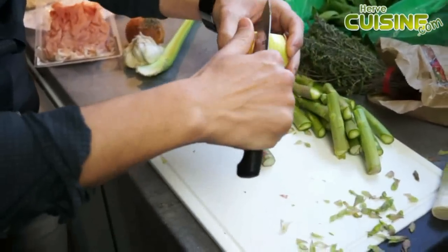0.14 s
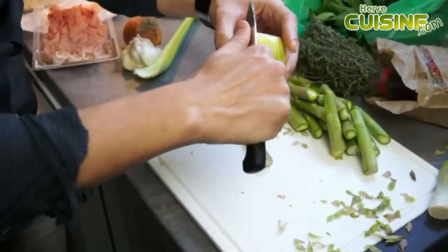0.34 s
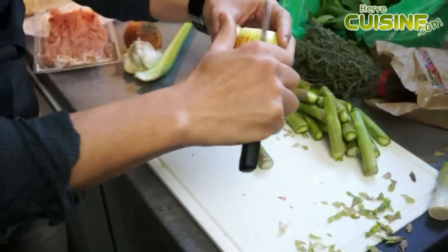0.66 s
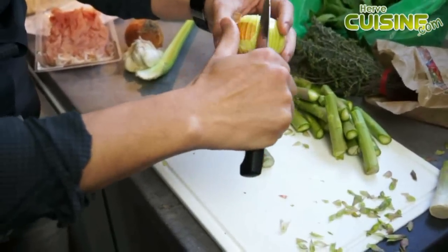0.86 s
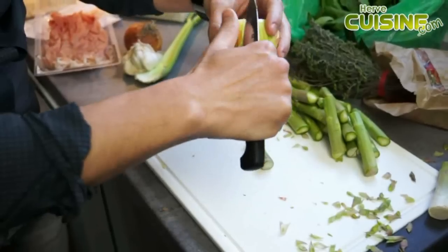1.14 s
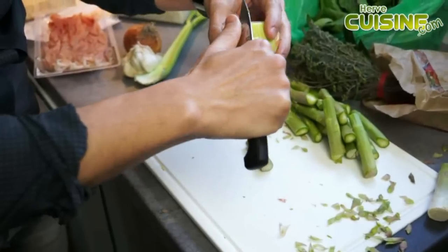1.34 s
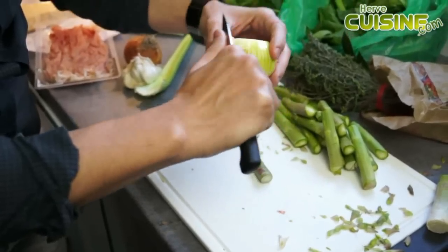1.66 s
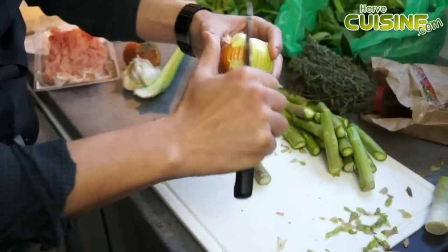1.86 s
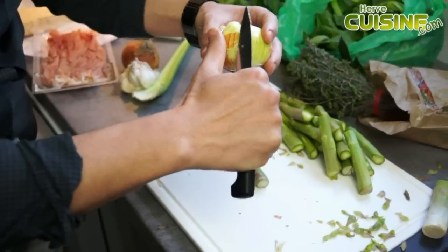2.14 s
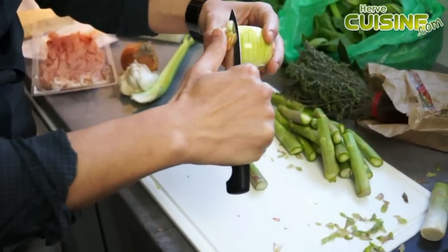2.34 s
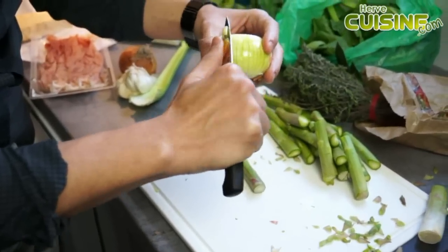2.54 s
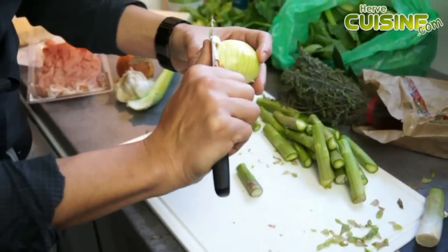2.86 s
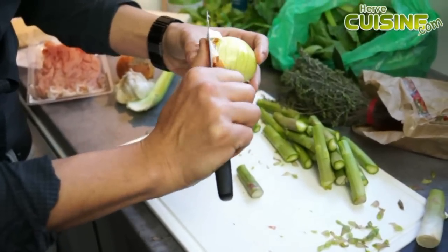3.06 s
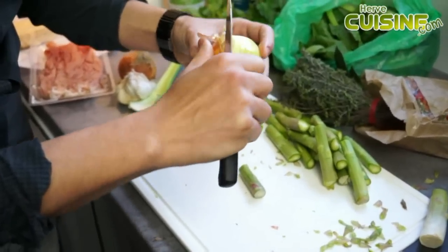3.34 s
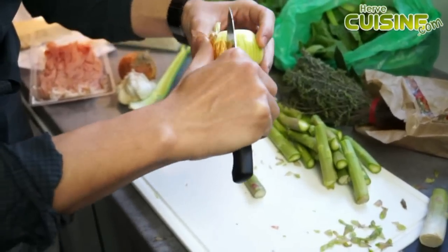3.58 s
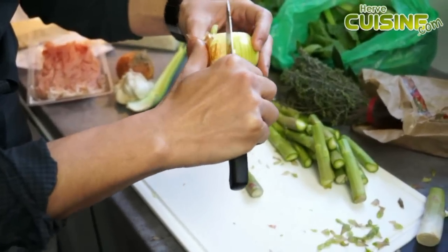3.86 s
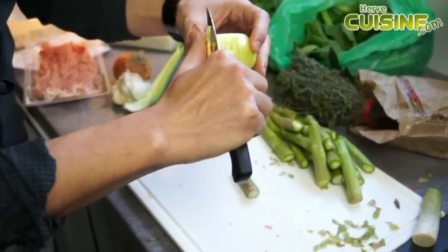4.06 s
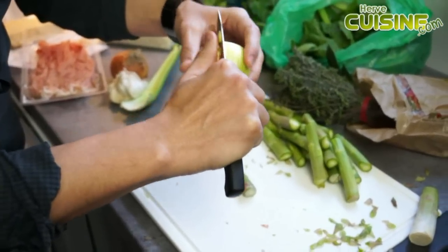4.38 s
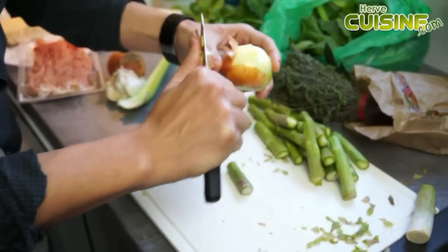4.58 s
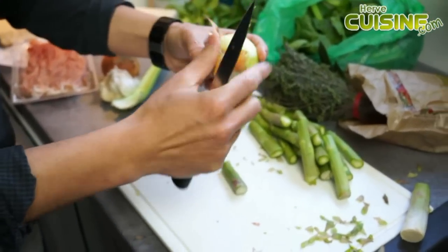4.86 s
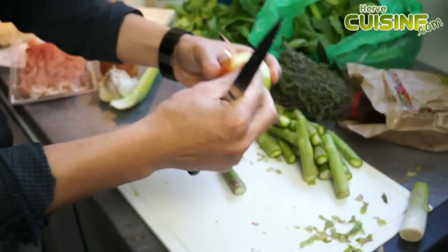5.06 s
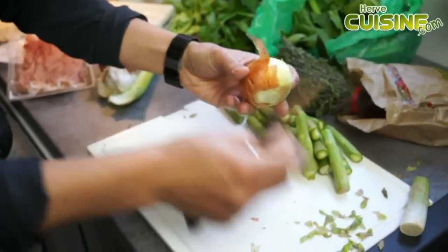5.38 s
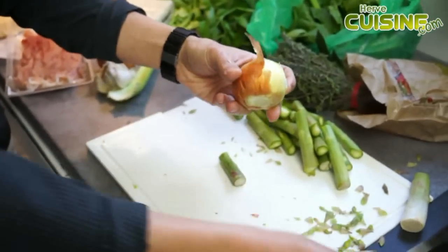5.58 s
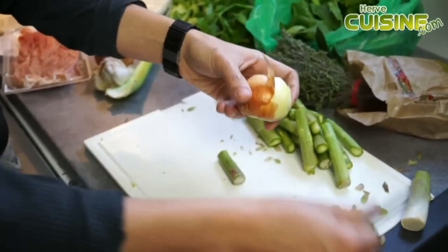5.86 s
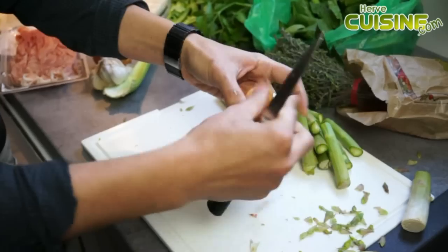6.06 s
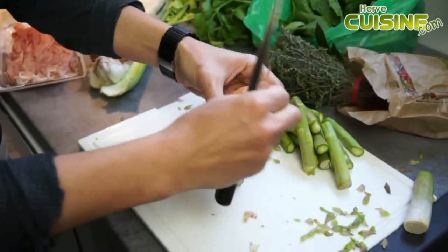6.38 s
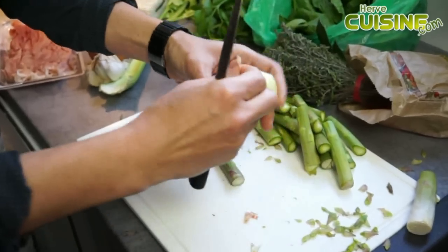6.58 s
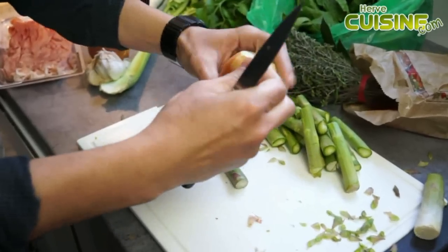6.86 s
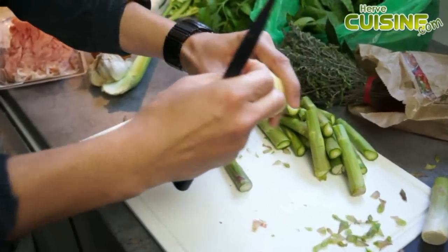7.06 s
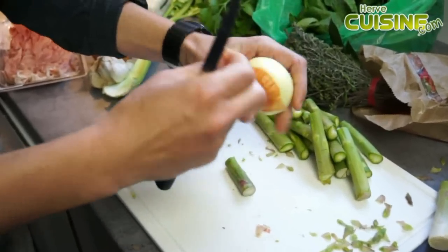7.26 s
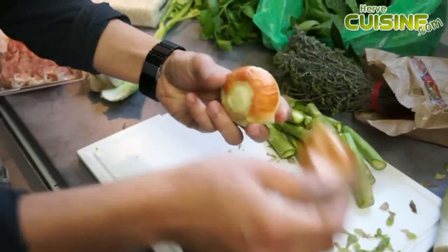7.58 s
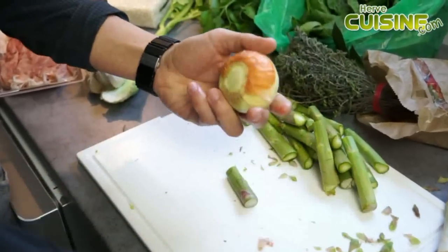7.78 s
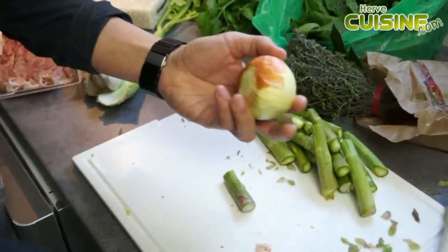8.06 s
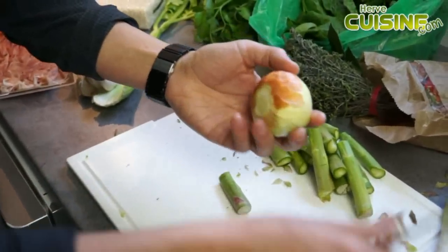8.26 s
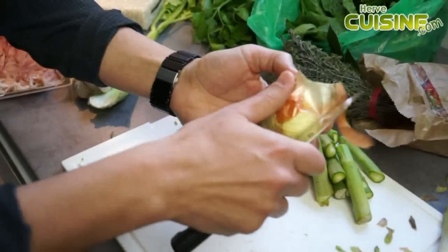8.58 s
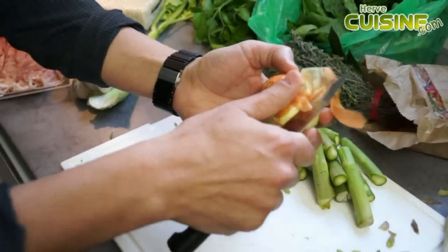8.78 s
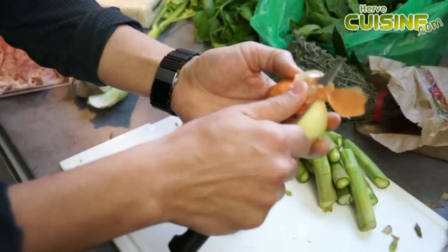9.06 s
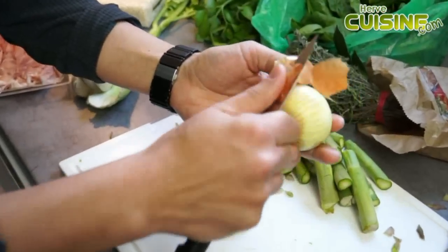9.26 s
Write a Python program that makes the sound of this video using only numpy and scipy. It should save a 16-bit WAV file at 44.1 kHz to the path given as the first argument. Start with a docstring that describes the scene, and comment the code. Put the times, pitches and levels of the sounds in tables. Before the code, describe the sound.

Dry papery onion skin crackles, snaps and rips under a small knife, close up, over a low motor hum and steady ventilation rush.

```python
"""In a small kitchen, two channels hear a motor hum against the mains and a steady rush of ventilation throughout.
Just above a cutting board an onion is peeled: single snaps and short crackling drags of the dry skin come first.
At 1.8 s a strip rips; from 4.6 s longer rips of tiny fibre breaks follow, and the loose flap buckles hollowly.
Hands rub and the knife knocks now and then; after more rips at 7.2 s a finger squeaks, and a last rip comes at 9.4 s.
Breaks and snaps are filtered clicks, knocks are damped modes, rubbing and air are shaped noise, the hum is sines."""
import sys
import numpy as np
from scipy import signal
from scipy.io import wavfile
from scipy.ndimage import uniform_filter1d, map_coordinates

SR = 44100
rng = np.random.default_rng(int(sys.argv[2]) if len(sys.argv) > 2 else 0)


def wrap_up_sound(samples):
    """Save the sound to the file named by the first command line argument, as 16-bit audio."""
    columns = np.atleast_2d(samples).T
    # keep every value between -1 and 1, then stretch to whole-number steps
    tamed = np.clip(columns, -1, 1)
    steps = np.round(tamed * 32767).astype(np.int16)
    wavfile.write(sys.argv[1], SR, steps)


N = 415851
TIME = np.arange(N) / SR
CUTOFF_HZ = 15900   # top of the recorded band

# a strip rips off; the loose flap's resonance glides, mostly downwards, from the first to the last pitch;
# levels are before the tearing gain:
# start_s, length_s, first_level_db, last_level_db, dullness_db_per_octave_downwards, first_hz, last_hz
RIP_EVENTS = [(1.764, 0.052, -36, -26.5, 1.5, 4000, 900), (4.571, 0.1, -30, -17, 0.5, 3400, 1100),
              (4.677, 0.025, -19, -20.5, 0.5, 520, 700), (4.705, .011, -19.5, -18, 0, 1000, 1100),
              (7.181, 0.046, -21, -25.5, 1.5, 2900, 1600), (7.229, 0.029, -25.5, -27, 0.5, 1300, 800),
              (7.278, 0.07, -20.5, -22.5, 0.5, 1300, 600), (9.403, 0.016, -28, -18, 2, 1600, 1300)]
RIP_ATTACK_S, RIP_RELEASE_S = 0.02, 0.022   # to swell and to die by 20 dB
# blade or thumb drags over the dry skin; levels are before the tearing gain:
# start_s, length_s, level_db, dullness_db_per_octave_downwards
STROKE_EVENTS = [(0.256, 0.01, -37, -6), (0.383, 0.0064, -38, -12), (0.487, 0.049, -42, -2.5),
                 (0.589, 0.049, -41.5, 1.5), (0.964, 0.0084, -38, 1.5), (1.139, 0.02, -47.5, 0.5),
                 (1.289, 0.0093, -45, -2), (1.415, 0.015, -35.5, 0.5), (1.628, 0.13, -42, 0.5),
                 (1.929, 0.033, -46.5, 1), (2.307, 0.067, -43.5, -3), (2.426, .025, -41, -6.5),
                 (2.48, 0.025, -36.5, -5), (2.622, 0.16, -45.5, -1.5), (2.808, 0.03, -42.5, -1),
                 (2.879, 0.011, -32.5, 1.5), (2.919, 0.028, -36.5, -4), (3.002, 0.065, -40, 2),
                 (3.089, 0.059, -35, -1), (3.272, 0.048, -45.5, 2), (3.642, 0.056, -45, 3),
                 (3.851, 0.041, -49, 1.5), (4.106, 0.1, -53, -2), (4.236, 0.077, -43.5, -1.5),
                 (4.411, 0.065, -33.5, -2.5), (4.881, 0.014, -45, -11), (5.157, 0.084, -39, -0.5),
                 (5.24, 0.04, -33, -1.5), (5.3, 0.03, -33.5, 2.5), (5.663, 0.042, -39, 1.5),
                 (5.912, 0.009, -30, 3), (6.047, 0.019, -45, 1.5), (6.24, 0.032, -50.5, 5),
                 (6.371, 0.093, -36.5, -0.5), (6.624, 0.025, -31.5, 0.5), (6.712, 0.029, -36.5, 3),
                 (6.749, 0.017, -30, -2.5), (7.014, 0.013, -45.5, 4), (7.136, .02, -43, 0),
                 (7.16, 0.01, -33, -4), (7.39, 0.053, -38.5, 0), (7.494, 0.038, -33.5, 0),
                 (7.653, 0.011, -43.5, 2.5), (7.765, 0.013, -34, 1), (7.794, 0.0046, -38, 3.5),
                 (7.898, 0.088, -37.5, 1), (8.023, 0.21, -46, -2), (8.21, 0.099, -44, 2.5),
                 (8.49, 0.035, -46, 2.5), (8.599, 0.075, -40, 3.5), (8.719, 0.02, -39, 3),
                 (8.8, 0.035, -42, 3.5), (8.898, 0.12, -42, 2.5), (9.006, 0.025, -40, 3.5),
                 (9.081, 0.013, -31.5, -0.5), (9.148, 0.027, -39, 0), (9.255, 0.023, -40, 2),
                 (9.321, 0.035, -34.5, 1.5)]
# the rush of ventilation over time: time_s, level_db
VENT_LEVEL_CURVE = [(0, -49.5), (1.7, -48), (3, -47.5), (4.5, -48), (6.5, -47.5), (7.6, -52), (9.43, -50.5)]


def tearing(breaks_per_s=1000, rate_follows=0.75, colour_db=5.0, even_s=0.018, gain_db=-7.0):
    """Fibres break at random; a harder pull breaks more of them, and each break has its own size and colour."""
    # colour of the dry skin: hz, db_per_hz
    skin_colour = [(300, -29), (500, -9), (850, -16), (1200, -11), (1750, -9), (2400, -7.5), (3000, -6),
                   (4500, -1.5), (8000, 2.5), (10500, 5.5), (13000, -2), (16000, -21)]
    # a stroke crackles unequally, a rip is fine-grained but catches and jumps ahead
    stroke_size_db, rip_size_db = 4.4, 3.3
    stroke_clump_db, rip_clump_db = 1.2, 2.2
    # the colour wanders as the skin bends; in a rip so many fibres break that it evens out
    stroke_patchy_db, rip_patchy_db = 3.2, 1.8
    flap_wander_octaves = 0.35
    # a flap radiates most at its resonance; below it only the bulb does, weakly
    flap_damping, flap_leak = 0.85, 0.2
    tight_skin_hz = 586   # the same edge for skin still lying on the bulb

    level_db, dullness = pull()
    flap_hz = np.zeros(N)   # zero: between rips there is no loose flap
    for start, length, *_, first_hz, last_hz in RIP_EVENTS:
        during = (TIME > start - RIP_ATTACK_S) & (TIME < start + length + RIP_RELEASE_S)
        done = np.clip((TIME[during] - start) / length, 0, 1)
        flap_hz[during] = first_hz * (last_hz / first_hz) ** done
    ripping = flap_hz > 0

    rate = breaks_per_s * from_db(rate_follows * np.maximum(level_db + 42.5, -6))
    size_db = np.where(ripping, rip_size_db, stroke_size_db)
    sizes = from_db(size_db * np.minimum(rng.exponential(1, N), 4.5)) * rng.choice([-1, 1], N)
    breaks = sizes * (rng.random(N) < rate / SR)

    # the pull sets the power released; the breaks share it, in clumps
    power = uniform_filter1d(breaks ** 2, max(int(even_s * SR), 1))
    clump_db = np.where(ripping, rip_clump_db, stroke_clump_db)
    evened = breaks / np.sqrt(np.abs(power) + 0.17 * rate / SR)
    breaks = evened * from_db(level_db + clump_db * drift(160))

    at = np.flatnonzero(breaks)   # from here on only the samples with a break
    break_time, ripping = TIME[at], ripping[at]
    flap_hz = flap_hz[at] * 2 ** (flap_wander_octaves * drift(90, break_time))
    edge_hz = np.where(ripping, flap_hz, tight_skin_hz)
    patchy_db = np.where(ripping, rip_patchy_db, stroke_patchy_db)
    out, total = np.zeros(N), 0
    for k, (hz, width, sos) in enumerate(bands(287.6, count=16)):
        ratio = edge_hz / hz
        flap = np.maximum(1 / np.hypot(1 - ratio ** 2, flap_damping * ratio), flap_leak)
        # each break favours a few bands, and the skin's own colour shifts as it bends
        favour_db = colour_db * np.clip(rng.standard_normal(len(at)), -2, 2)
        colour = rms_one(from_db(favour_db + patchy_db * drift(30, break_time)))
        octaves_down = np.minimum(np.log2(8500 / hz), 2.4)
        clicks = np.full(N, 1e-18)
        clicks[at] = breaks[at] * from_db(dullness[at] * octaves_down) * flap * colour
        gain = from_db(at_hz(skin_colour, hz))
        out += gain * (-1) ** k * signal.sosfilt(sos, clicks)
        total += gain ** 2 * width / (SR / 2)
    return from_db(gain_db) * out / np.sqrt(total)


def pull():
    """Level and dullness of the crackle: the strongest stroke or rip of the moment sets both."""
    hold_db, hold_dullness_db = -59.5, 2.5   # the faint crackle of the bulb just being held
    rip_bend = 0.7   # under 1: the pull changes fastest at the start
    level_db, dullness = np.full(N, hold_db), np.full(N, hold_dullness_db)
    for start, length, db, dull in STROKE_EVENTS:
        stroke = db + stroke_db(start, length)
        dullness[stroke > level_db] = dull
        level_db = np.maximum(level_db, stroke)
    for start, length, first_db, last_db, dull, _, _ in RIP_EVENTS:
        done = np.clip((TIME - start) / length, 0, 1)
        rip = first_db + (last_db - first_db) * done ** rip_bend
        rip = rip + move_db(start, length, RIP_ATTACK_S, RIP_RELEASE_S)
        dullness[rip > level_db] = dull
        level_db = np.maximum(level_db, rip)
    return level_db, dullness


def stroke_db(start, length):
    """The envelope of a stroke of the hand: the longer, the gentler its ends."""
    return move_db(start, length, 0.002 + 0.99 * length, 0.026 + 0.83 * length)


def move_db(start, length, attack_s, release_s):
    """One move in dB under its hold: it swells and dies by 20 dB in the attack and release times."""
    early = np.maximum(start - TIME, 0)
    late = np.maximum(TIME - start - length, 0)
    return -20 * (early / attack_s + late / release_s)


def snaps(run_s=0.0024, after_share=0.37, width_share=0.47, low_share=0.18, top_hz=13000, gain_db=-8.5):
    """A crack jumps through the shell and runs on in a few smaller steps; the flake rings for a cycle or two."""
    # the loud single snaps of the skin, before gain_db: time_s, energy_db, centre_hz
    single_snaps = [(0.191, -4.5, 8700), (0.2732, -8.5, 11000), (0.3135, -13, 10500), (0.3917, -4.5, 10600),
                    (0.6399, -11, 5560), (0.6805, -12, 8340), (0.9755, -10, 9200), (1.0592, -14.5, 10100),
                    (1.418, -9.5, 9200), (1.5024, -15, 7650), (1.625, -6, 7760), (1.63, -22, 9100),
                    (1.6722, -4, 9200), (1.7999, -8, 9100), (1.8049, 8, 9500), (1.8078, -12, 8000),
                    (1.8122, 6.5, 6760), (2.364, -13, 9400), (2.4838, -5, 10100), (2.495, -7, 10200),
                    (2.6492, -5.5, 10500), (2.6648, -9.5, 10400), (2.7901, 1, 10500), (2.8772, 5.5, 6240),
                    (2.9207, 1, 7000), (2.9878, 0.5, 6740), (3.0213, -18, 7000), (3.0398, -17, 9600),
                    (3.0535, -8.5, 5440), (3.0636, -4, 9900), (3.222, -8, 9500), (3.2892, -9.5, 10400),
                    (3.6146, -8.5, 7370), (3.8588, -15, 7000), (3.951, -17.5, 8360), (4.167, -13, 8900),
                    (4.183, -13, 6830), (4.2684, -8, 9650), (4.2842, -12, 9900), (4.3915, -4, 8200),
                    (4.518, -5, 9700), (4.5594, 0, 9000), (4.6241, 4, 8000), (4.6393, 5, 7000),
                    (4.674, 9.5, 6000), (4.6854, 8, 5440), (4.6905, 6.5, 5000), (4.7162, 5, 7700),
                    (4.721, 4, 7500), (4.9037, -7, 10000), (5.11, -2, 9600), (5.1476, 3.5, 9800),
                    (5.1934, -9, 8700), (5.3012, 11, 10900), (5.414, -5.5, 8600), (5.55, -1, 8900),
                    (5.6449, -11, 7700), (5.9057, -1.5, 5850), (5.9817, -11.5, 8140), (6.2402, -6.5, 8500),
                    (6.301, -1.5, 9300), (6.341, -7.5, 3970), (6.3611, -14, 9800), (6.3963, 4, 8900),
                    (6.4405, 8, 9200), (6.4412, -6, 2770), (6.4627, 0, 8200), (6.717, 2, 7700),
                    (6.7262, -2, 8500), (6.7516, -1, 7700), (6.7703, 3.5, 8500), (6.926, -4.5, 7440),
                    (6.9822, -8.5, 7740), (7.021, -16, 9500), (7.0327, -5, 9050), (7.1, -5, 6740),
                    (7.1645, -6, 8000), (7.1782, 2, 7040), (7.1877, -6, 4500), (7.201, -2, 3500),
                    (7.217, -6, 6000), (7.2702, 9.5, 7000), (7.2712, 8.5, 7000), (7.2867, 0, 5000),
                    (7.2945, 3, 4130), (7.3255, 5, 5000), (7.6116, -8, 9450), (7.6422, -5, 9650),
                    (7.763, -6, 9000), (7.7642, 1, 9600), (7.7725, -7, 9600), (7.8337, -1.5, 7400),
                    (7.873, -16, 6500), (8.482, -3, 7800), (8.6055, -15, 3200), (8.6244, -0.5, 11000),
                    (8.648, -18, 7200), (8.672, -2, 5060), (8.7746, -7.5, 10800), (8.8358, -0.5, 5800),
                    (8.8998, -10, 9400), (8.973, -3, 10200), (9.0097, 5, 8060), (9.0125, 4, 8500),
                    (9.0165, 0, 7800), (9.0278, 5, 7860), (9.0612, 0, 6850), (9.136, -12, 8800),
                    (9.1405, 7, 8200), (9.1623, -1, 8650), (9.17, -14, 8500), (9.1945, -5.5, 7300),
                    (9.2195, -3, 8540), (9.2258, -12, 8000), (9.2591, -7.5, 5370), (9.2686, -6, 3220),
                    (9.2835, -0.5, 7100), (9.341, -2.5, 7400), (9.3585, -5, 7500), (9.386, -0.5, 3630),
                    (9.396, 7.5, 7600), (9.4062, 5.5, 4260), (9.4112, 13.5, 7900)]
    size = 512   # samples in one snap
    out = np.zeros(N + size)
    rows = [*single_snaps, *cracks(), *ticks()]
    delays = rng.random((len(rows), 6))
    steps = rng.uniform(-1.5, 1.5, (len(rows), 6))
    for (s, db, hz), delay, step in zip(rows, delays, steps):
        crack = np.zeros(size)
        step_at = np.minimum((delay * run_s * SR).astype(int), size - 1)
        crack[step_at] = after_share * step * (1 - delay / 2)
        crack[0] = 1
        # a small flake radiates little bass
        edges = [min(low_share * hz, 6000), min(top_hz, CUTOFF_HZ)]
        flake = signal.butter(2, edges, "band", fs=SR, output="sos")
        snap = signal.sosfilt(flake, resonate(crack, hz, width_share * hz))
        start = round(s * SR)
        out[start:start + size] += from_db(db + gain_db) * snap / np.linalg.norm(snap)
    return out[:N]


def cracks(count=5, spread_db=3.5, spread_octaves=0.086):
    """The cracks of each crunch come unevenly and share its energy: (time s, energy dB, centre Hz)."""
    # a flake crumples in a quick run of cracks, before the snaps' gain:
    # start_s, length_s, energy_db, centre_hz
    crunch_events = [(2.691, 0.0064, -4.5, 8700), (3.081, 0.014, 1, 9800), (3.127, 0.02, -4.5, 6000),
                     (4.411, 0.0068, 2.5, 8700), (4.4695, 0.0073, 2, 8700), (4.535, 0.0028, -3.5, 8700),
                     (4.72, .006, 0, 9000), (5.237, 0.013, 2, 8750), (5.312, .009, -11, 8500),
                     (5.329, 0.0097, 3, 9800), (7.308, .003, -1, 7500), (7.355, 0.0023, -5, 8000),
                     (8.602, 0.0084, -4, 4330), (8.969, 0.0073, -1.5, 10200), (9.139, 0.0025, 0, 7540)]
    rows = []
    for start, length, db, hz in crunch_events:
        times = start + length * (np.arange(count) + rng.random(count) / 2) / count
        for s, (size, pitch) in zip(times, rng.standard_normal((count, 2))):
            energy_db = db - 10 * np.log10(count) + spread_db * size
            rows.append((s, energy_db, min(hz * 2 ** (spread_octaves * pitch), CUTOFF_HZ)))
    return rows


def ticks(count=2, over_stroke_db=15.5, spread_db=2, late_s=0.029, centre_hz=8700, spread_octaves=0.17):
    """A few small snaps fall in or just after each stroke and follow its level: (time s, energy dB, centre Hz)."""
    rows = []
    for start, length, db, _ in STROKE_EVENTS:
        for when, (size, pitch) in zip(rng.random(count), rng.standard_normal((count, 2))):
            s = min(start + when * (length + late_s), TIME[-1])
            energy_db = db + over_stroke_db + spread_db * np.tanh(size)
            rows.append((s, energy_db, min(centre_hz * 2 ** (spread_octaves * pitch), CUTOFF_HZ)))
    return rows


def buckles(t60_s=0.025, gain_db=-7.5):
    """The loose flap flips through as it is pulled: a hollow pop, a sine that dies away quickly."""
    # the pops of the flap, before gain_db: time_s, energy_db, pitch_hz
    pop_events = [(4.625, -20.5, 1040), (4.652, -13, 1520), (4.677, -12, 890), (4.684, -20, 460),
                  (4.69, -27, 340), (4.701, -23, 436), (4.713, -16, 880), (7.183, -29, 990),
                  (7.241, -18, 534), (7.314, -21, 406), (7.328, -21, 403)]
    out = np.zeros(N)
    for s, db, hz in pop_events:
        age = np.maximum(TIME - s, 0)
        decay = np.exp(-np.log(1000) * np.minimum(age / t60_s, 10))
        pop = np.sin(2 * np.pi * hz * age) * decay
        out += from_db(db + gain_db) * pop / np.linalg.norm(pop)
    return out


def knocks(contact_db=19.5):
    """Each knock rings the damped modes of knife and bulb, most strongly those near the pitch of its contact."""
    # the knife knocks on the bulb, before the mix: time_s, level_db, contact_hz
    knock_events = [(0.976, -41.5, 1530), (1.812, -39, 1300), (2.8775, -30, 1820), (2.989, -34, 1570),
                    (4.4114, -57, 2000), (5.625, -36, 880), (5.914, -37, 1790), (6.4245, -39, 1500),
                    (6.4406, -21.5, 1150), (7.8333, -37, 1710), (7.853, -37, 800), (9.2676, -54, 2010)]
    # what knife and bulb ring with: mode_hz, relative_level_db, t60_s
    ring_modes = [(690, -3, 0.014), (870, -0.5, 0.013), (953, -5, 0.024), (990, -1, 0.01),
                  (1280, -13, 0.026), (1380, -14, 0.02), (1547, -9, 0.037), (1820, -8, 0.026),
                  (2110, -1.5, 0.02), (2800, 14, 0.0064), (3320, -3, .012)]
    s, db, contact_hz = np.transpose(knock_events)
    out = np.zeros(N)
    for k, (hz, mode_db, t60) in enumerate(ring_modes):
        # contact_db is lost at one octave from the contact pitch, four times that at two
        strength_db = mode_db - contact_db * np.log2(hz / contact_hz) ** 2
        clicks = np.full(N, 1e-18)
        clicks[(s * SR).astype(int)] = from_db(db + strength_db)
        r, w = from_db(-60 / (t60 * SR)), 2 * np.pi * hz / SR
        ring = signal.lfilter([1, -r * np.cos(w)], [1, -2 * r * np.cos(w), r * r], clicks)
        out += ring * (-1) ** k
    return out


def rubbing(stick_db=6.0, rest_db=-70):
    """Skin and cloth slide unevenly: a dull, fluttering rustle."""
    # hands and sleeves rub: start_s, length_s, level_db
    rub_events = [(0.593, 0.11, -51.5), (5.25, 0.6, -60.5), (6.35, 0.15, -49), (6.705, 0.19, -50.5),
                  (7.197, 0.45, -55), (7.8, 0.47, -58), (8.66, 0.11, -51), (9.0, 0.5, -55.5)]
    # colour of the rustle: hz, db_per_hz
    hand_colour = [(200, -42), (500, -1), (950, -0.5), (1500, -6.5), (3000, -16), (8000, -49)]
    level_db = np.max([db + stroke_db(start, length) for start, length, db in rub_events], axis=0)
    level_db = np.maximum(level_db, rest_db) + stick_db * np.tanh(drift(45))
    return from_db(level_db) * air_noise(hand_colour, 221, count=8)


def squeaks(pitch_hz=1716, width_hz=90, attack_s=0.015, release_s=0.03):
    """A damp fingertip sticks and slips on the smooth bulb, at one narrow pitch."""
    # a finger squeaks faintly on the peeled bulb: start_s, length_s, level_db
    squeak_events = [(7.834, 0.02, -56), (7.91, 0.033, -49)]
    moves = [db + move_db(start, length, attack_s, release_s) for start, length, db in squeak_events]
    return narrow_noise(rng.standard_normal(N), pitch_hz, width_hz, np.max(moves, axis=0))


def kitchen(x, board_s=.0007, board_share=0.39, gap_s=0.00059, build_s=0.00017, near_db=21.0, near_s=0.02,
            pan_db=2.5, sway_db=1.0, lag_s=.000005, turn_rad=1.81):
    """Direct sound, a quick bounce off the board, dense echoes off the worktop and a short tail off the walls."""
    # decay of the wall tail: hz, t60_s
    tail_t60 = [(300, 0.2), (2000, 0.6), (6000, 0.6), (14000, 0.3)]
    # strength of the echoes in each band: hz, energy_db
    echo_energy = [(300, 10), (1500, 6), (4000, 2), (9000, 0), (15000, -2)]
    # left-right likeness of the echoes: hz, likeness_minus_1_to_1
    echo_likeness = [(200, 1), (650, -0.26), (1500, -0.18), (4000, 0.55), (9000, 0.27), (12500, 1)]
    t = TIME[:SR // 2]
    white = rng.standard_normal((2, 2, 2, 1, len(t)))
    # after a short gap the echoes build up; the worktop adds strong early ones
    onset = 1 - np.exp(-np.maximum(t - gap_s, 0) / build_s)
    onset = onset * (1 + from_db(near_db) * np.exp(-t / near_s))
    tails = 0
    for k, (hz, width, sos) in enumerate(bands(208.0, count=12)):
        decay = onset * np.exp(-np.log(1000) * t / at_hz(tail_t60, hz))
        echoes = spread(signal.sosfilt(sos, white[k % 2]), at_hz(echo_likeness, hz))
        tails = tails + from_db(at_hz(echo_energy, hz)) * echoes * decay / np.linalg.norm(decay)

    # the flakes face now this way, now that, and so shift between two sets of echoes
    facing = turn_rad * drift(60)
    room = np.zeros((2, N))
    for share, tail in zip((np.cos(facing), np.sin(facing)), tails):
        room += signal.oaconvolve((x * share)[None], tail, axes=1)[:, :N]

    # the hands move: the source sways, and the bounce comes now sooner, now later
    samples = np.arange(N)
    bounce = np.round(board_s * SR * (1 + .2 * drift(3))).astype(int)
    left = x + board_share * x[np.clip(samples - bounce, 0, N - 1)]
    right = map_coordinates(left, [samples - lag_s * SR], order=3)
    balance = from_db(np.array([[.5], [-.5]]) * (pan_db + sway_db * drift(15.0)))
    return balance * [left, right] + room


def ventilation(swell_db=1.5, flutter_db=3.0):
    """Rushing air, part of it ringing unsteadily in the duct."""
    # colour of the rush: hz, db_per_hz
    rush_colour = [(20, -4), (35, -8.5), (60, -13.5), (95, -6), (140, -7), (200, -8.5), (280, -3.5),
                   (400, -17.5), (600, -11.5), (1300, -21.5), (3300, -25), (4200, -29.5), (7000, -28),
                   (10000, -36.5), (16000, -35)]
    # resonances in the rush, before flutter and half the level curve's change: centre_hz, width_hz, level_db
    duct_modes = [(322.6, 39, -60.5), (462.6, 20, -65), (756, 73, -65.5), (841, 12, -62.5),
                  (2208, 240, -61.5), (4720, 770, -64.5), (5660, 400, -66), (7000, 1000, -62),
                  (7770, 250, -74)]
    level_db, = in_time(VENT_LEVEL_CURVE)
    white = rng.standard_normal((2, N))
    rush = from_db(level_db + swell_db * drift(4.22)) * air_noise(rush_colour, 19.36, count=22)
    duct = np.zeros((2, N))
    for hz, width, db in duct_modes:
        duct += narrow_noise(white, hz, width, db) * from_db(flutter_db * drift(10))
    return rush + duct * from_db((level_db - level_db.mean()) / 2)


def hum(wander_rad=0.041, waver_db=.3):
    """Mains and motor tones, some beating 16 times a second; standing waves place each between the ears."""
    # mains hum, motor orders and their sum and difference tones, before the slow wavering:
    # pitch_hz, level_db, left_over_right_db, left_lead_rad
    hum_tones = [(16.1, -59, 4, 0), (83.9, -67, 0, 0), (100.03, -50.5, -1, .5), (116.14, -51, 1.7, .2),
                 (174.2, -62.5, -1.5, -.1), (216.15, -55, 5.5, -.7), (232.27, -51.5, 3.3, -.4),
                 (332.3, -67, -2, 1.9), (449.6, -67.5, -2, .9), (479.6, -72, 2, .9), (748.3, -71, 0, .3)]
    out, side = np.zeros((2, N)), np.array([[.5], [-.5]])
    vent_db, = in_time(VENT_LEVEL_CURVE)
    for hz, db, pan_db, lead in hum_tones:
        phase = 2 * np.pi * (hz * TIME + rng.random()) + wander_rad * drift(1.66)
        # the upper tones fade and return as the microphone moves through a standing wave; they borrow the
        # timing of the rush's level curve
        shade_db = (vent_db - vent_db.mean()) * (hz > 200)
        gain = np.sqrt(2) * from_db(db + shade_db + waver_db * drift(2.28))
        out += gain * from_db(side * pan_db) * np.sin(phase + side * lead)
    return out


def air_noise(spectrum, low_hz, count):
    """Diffuse stereo noise of a given colour, rms 1."""
    # left-right likeness of diffuse noise: hz, likeness_minus_1_to_1
    air_likeness = [(25, 0.62), (60, 1), (140, 0.51), (280, 0.15), (550, -0.32), (2000, -0.41),
                    (8000, 0.013), (12000, 0.81)]
    white = rng.standard_normal((2, 2, N))
    out = np.zeros((2, N))
    for k, (hz, width, sos) in enumerate(bands(low_hz, count)):
        pair = signal.sosfilt(sos, white[k % 2])
        out += from_db(at_hz(spectrum, hz)) * spread(pair, at_hz(air_likeness, hz))
    return rms_one(out)


def narrow_noise(white, hz, width_hz, db):
    """Noise passed twice through one resonance, at a given level."""
    once = resonate(white, hz, width_hz)
    return from_db(db) * rms_one(resonate(once, hz, width_hz))


def resonate(x, hz, width_hz):
    """One resonance with gain about 1 on top."""
    r = np.exp(-np.pi * width_hz / SR)
    zeros = np.array([1, 0, -1]) * (1 - r * r) / 2
    return signal.lfilter(zeros, [1, -2 * r * np.cos(2 * np.pi * hz / SR), r * r], x + 1e-18)


def spread(pair, likeness):
    """Two unrelated noises become left and right of a given likeness."""
    c = np.clip(likeness, -1, 1)
    middle, sides = np.sqrt(1 + c) * pair[0], np.sqrt(1 - c) * pair[1] * [[1], [-1]]
    return (middle + sides) / np.sqrt(2)


def bands(low_hz, count):
    """Neighbouring band-passes up to the cutoff: (centre Hz, width Hz, filter)."""
    edges = np.geomspace(low_hz, CUTOFF_HZ, count + 1)
    return [(np.sqrt(a * b), b - a, signal.butter(2, [a, b], "band", fs=SR, output="sos"))
            for a, b in zip(edges, edges[1:])]


def drift(rate, when=TIME):
    """Random curve: straight lines between normal draws of spread 1, rate draws a second."""
    knots = rng.standard_normal(4096)
    return np.interp(when * rate, np.arange(len(knots)), knots)


def in_time(rows):
    """Each column of a curve at every sample."""
    s, *columns = np.transpose(rows)
    return [np.interp(TIME, s, c) for c in columns]


def at_hz(points, hz):
    """Read a table on a log-frequency axis."""
    freqs, values = np.transpose(points)
    return np.interp(np.log(hz), np.log(freqs), values)


def rms_one(x):
    """Scale to unit power."""
    return x / np.sqrt(np.mean(x ** 2) + 1e-20)


def from_db(db):
    """Decibels to gain."""
    return np.exp(np.asarray(db) * (np.log(10) / 20))


def scene(knock_room_db=-9.0, knock_direct_db=1.0):
    """The peeling in its room, over the steady machines; the knocks sound drier than the skin."""
    knock = knocks()
    in_room = tearing() + snaps() + buckles() + from_db(knock_room_db) * knock
    handwork = kitchen(in_room) + from_db(knock_direct_db) * knock
    return handwork + squeaks() + rubbing() + ventilation() + hum()


def record(dry):
    """The top is cut steeply."""
    return signal.sosfilt(signal.ellip(10, .1, 80, CUTOFF_HZ, fs=SR, output="sos"), dry)


dry = scene()
out = record(dry)
wrap_up_sound(out)
```